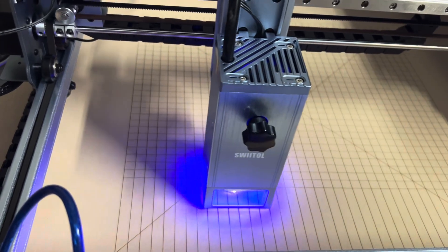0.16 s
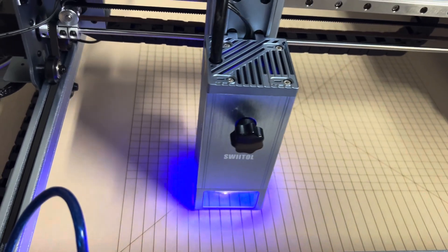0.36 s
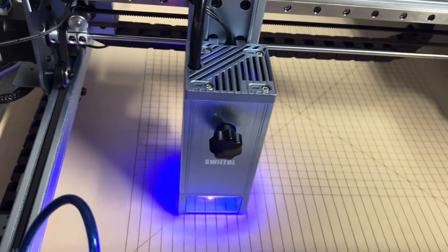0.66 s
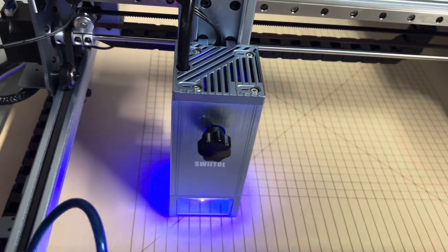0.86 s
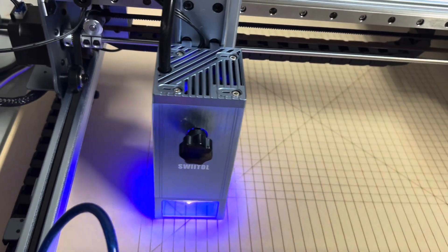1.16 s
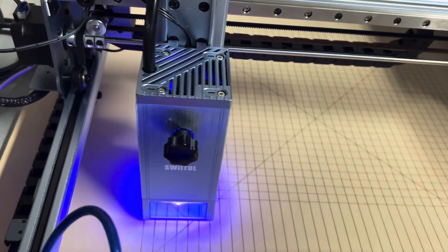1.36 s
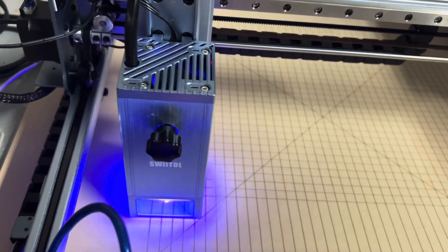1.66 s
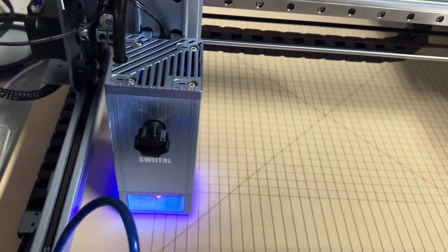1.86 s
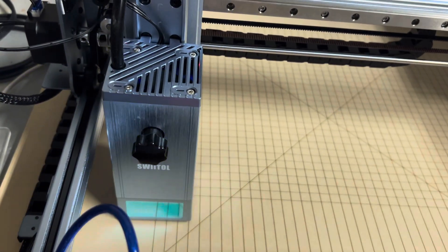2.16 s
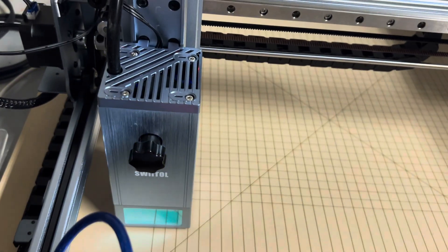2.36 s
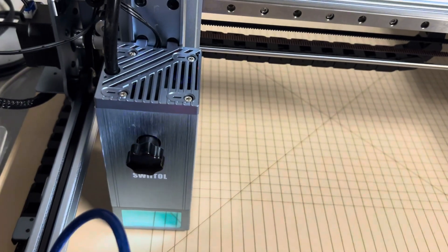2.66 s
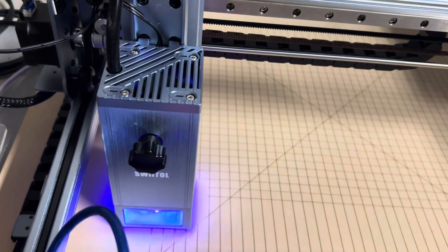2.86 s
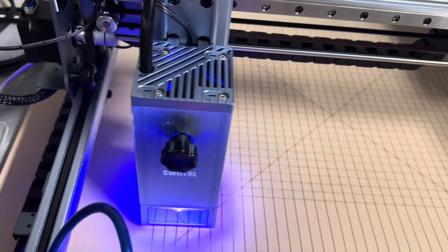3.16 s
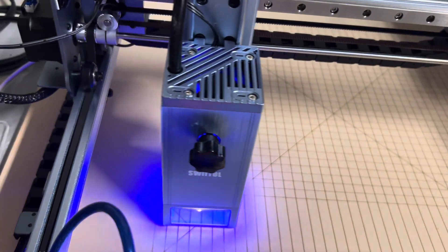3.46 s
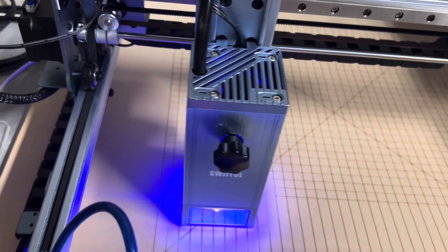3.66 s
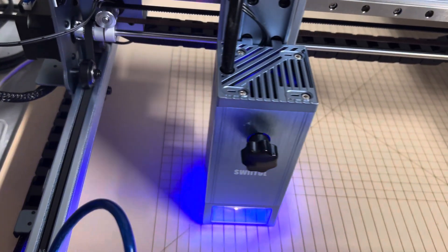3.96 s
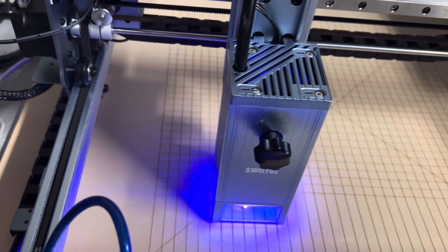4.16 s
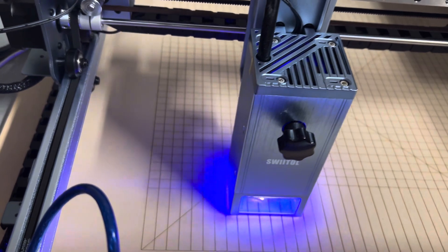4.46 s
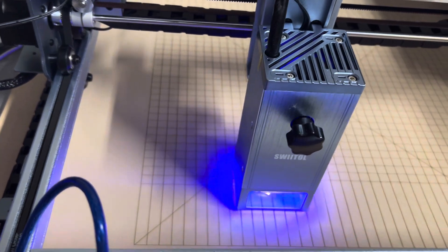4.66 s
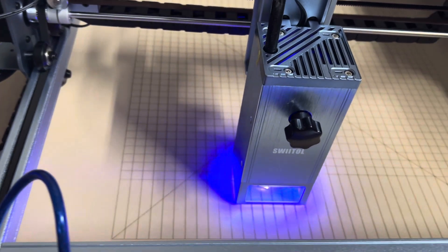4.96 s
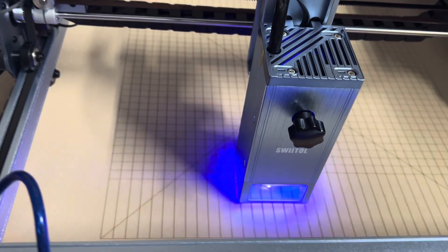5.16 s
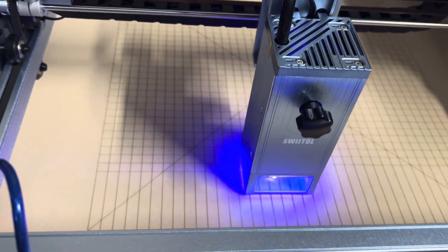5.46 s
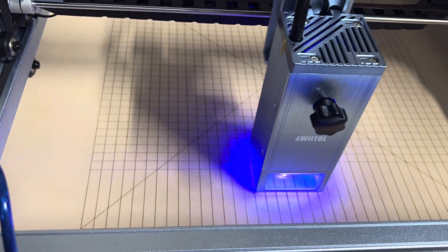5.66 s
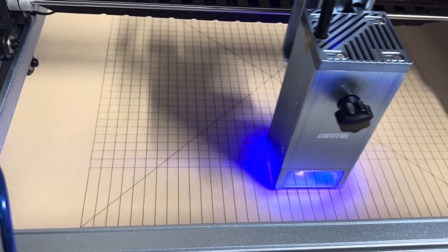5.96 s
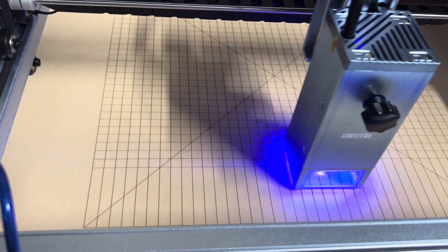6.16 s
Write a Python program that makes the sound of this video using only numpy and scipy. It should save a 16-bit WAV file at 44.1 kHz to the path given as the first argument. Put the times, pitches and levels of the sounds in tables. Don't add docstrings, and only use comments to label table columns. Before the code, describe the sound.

A steady rush of fan and air-jet noise with a thin high whine that drops out for a second mid-way, then returns as the engraver head travels back.

```python
import sys
import numpy as np
from scipy import signal
from scipy.fft import rfft, irfft, next_fast_len
from scipy.io import wavfile
from scipy.ndimage import uniform_filter1d

SR = 44100
rng = np.random.default_rng(int(sys.argv[2]) if len(sys.argv) > 2 else 0)


def voltage_ratio(decibels):
    exponent = np.asarray(decibels, float) / 20
    return 10 ** exponent


def transcribe(u):
    v = np.clip(np.atleast_2d(u).T, -1, 1)
    q = np.round(v * 32767).astype(np.int16)
    wavfile.write(sys.argv[1], SR, q)


N = 279153

HISS_FROM_HZ = 6900
BEAM_OFF_S, BEAM_ON_S = 1.93, 2.8


def away():
    t = np.arange(N) / SR
    return np.clip(np.maximum(BEAM_OFF_S - t, t - BEAM_ON_S), 0, None)


def outward():
    return np.arange(N) / SR > BEAM_ON_S


def head_place():
    reach_in_s, reach_out_s, place_at_end = 1.68, 1.28, .05
    reach_s = np.where(outward(), reach_out_s, reach_in_s)
    return place_at_end + (1 - place_at_end) * np.tanh(away() / reach_s)


def drift(per_s):
    points, spacing_s = 640, .01
    slow = np.fft.rfftfreq(points, spacing_s) < per_s
    x = irfft(rfft(rng.standard_normal(points)) * slow)
    return np.interp(np.arange(N) / SR, np.arange(points) * spacing_s, x / x.std())


def tone(hz, level_db, pan_db, lead=0., waver_db=1., start=0.):
    turn = 2 * np.pi * (np.cumsum(hz * np.ones(N)) / SR + start)
    size = np.sqrt(2) * voltage_ratio(level_db + waver_db * drift(5.))
    left = voltage_ratio(pan_db / 2) * np.sin(turn)
    right = voltage_ratio(-pan_db / 2) * np.sin(turn + lead)
    return size * np.array([left, right])


def read(rows, hz):
    f, *columns = np.transpose(rows)
    return np.array([np.interp(np.log(hz + 1), np.log(f + 1), c) for c in columns])


def eddies(shape, bins, frames):
    x = uniform_filter1d(rng.standard_normal(shape), size=bins, axis=0)
    x = uniform_filter1d(x, size=frames, axis=1)
    return x / x.std()


def colour(fan, jet, hiss, hz):
    # frequency in Hz, level in dB per Hz, left minus right in dB,
    # left-right likeness 0-1, right phase lead in rad.
    workshop = [(25, -95, -0.1, 0.69, -0.07), (35, -86, 0.5, 0.91, 0.02), (45.4, -77, -1.3, 1, 0.05),
                (75, -70, -0.9, 0.99, 0.02), (95, -75.5, -0.8, 0.87, -0.035), (150, -74, -2.4, 0.94, -0.12),
                (200, -71, 0, 1, -0.0075), (222, -77.5, -2, 0.44, -0.2), (285, -75, 0, 0.95, -0.04),
                (345, -75.0, -1, 0.77, -0.08), (390, -74.5, 2, 0.9, -0.18), (448, -72.6, 0.4, 0.91, -0.31),
                (567, -72, 1, 1, -0.49), (630, -69.0, 0.2, 0.92, -0.43)]
    # frequency in Hz, right phase lead in half turns.
    hiss_turns = [(6900, -.06), (8150, .04), (8500, .5), (9000, .8), (9500, 1), (10200, 1.13),
                  (10550, 1.55), (11000, 1.85), (12250, 2.05), (12450, 2.67), (13050, 2.88), (13500, 3),
                  (13900, 3.16), (14600, 3.7), (15300, 4)]
    field = read(workshop[:-1] + fan[:-1] + jet, hz)
    high = hz > HISS_FROM_HZ
    field[0, high] = read(hiss, hz)[0, high]
    field[1:3, high] = [[.2], [.99]]
    field[3, high] = np.pi * read(hiss_turns, hz)[0, high]
    return field[:, :, None]


def rush():
    # frequency in Hz, level in dB per Hz,
    # left minus right in dB, left-right likeness 0-1, right phase lead in rad.
    fan_left = [(630, -68.5, 1, 0.8, -0.66), (720, -64.5, 2, 1, -0.75), (870, -62, 4.5, 0.93, -1.6),
                (944, -62.5, 10, 0.53, -1.2), (1010, -72, -0.4, 0.3, 1), (1145, -73.5, 15, 0.45, -1.3),
                (1276, -64.5, 6, 0.58, -1.4), (1430, -64.5, 10, 0.73, -0.89), (1620, -64.5, 0, 0.88, -1.13),
                (1660, -68.5, -1, 0.67, -2.1), (1800, -73.5, 4, 0.4, -1), (1950, -71, 8, 0.47, -0.24),
                (2220, -66, 11, 0.45, -0.9), (2300, -70.5, 8.2, 0.64, -0.8)]
    fan_right = [(624, -71.5, -2, 0.91, -0.34), (687, -65.5, 1, 0.9, -0.34), (876, -65.5, 3, 0.68, -0.072),
                 (963, -69, 8, 0.49, 0.02), (1053, -59.5, 8, 0.88, -0.44), (1180, -67, 6, 0.99, -0.39),
                 (1300, -66.5, 1, 0.64, 0.03), (1430, -63.5, 7, 0.99, -0.0089),
                 (1610, -61.5, -1.5, 0.97, -0.0045), (1710, -61.5, -4, 0.95, -0.15),
                 (1826, -70.5, -1, 0.95, 0.01), (1950, -68, 1, 0.96, -0.034), (2180, -65.5, 0, 0.88, -0.15),
                 (2300, -66.6, 3.0, 0.87, -0.45)]
    jet_left = [(2320, -70.5, 10, 0.54, -1), (2500, -66.5, 13, 0.69, -1.4), (2720, -69, 10, 0.6, -0.9),
                (2850, -71, 12, 0.36, -0.95), (3030, -73.5, 7.8, 0.44, 0.028),
                (3480, -68.5, 8.8, 0.81, -0.14), (4000, -72, 6.2, 0.68, -0.17),
                (4570, -69.5, 4.4, 1, -0.041), (4850, -67, 9.9, 0.74, 0.01), (5270, -71.5, 9.6, 0.75, 0.34),
                (5600, -75, 6.0, 0.62, 0.83), (5800, -79, 5.4, 0.63, 1.2), (6500, -78, 8.9, 0.7, -0.04),
                (6900, -79.5, 1.3, 0.87, -0.05)]
    jet_right = [(2310, -67, 1, 0.96, -0.78), (2560, -65, 4.5, 1, -1), (2670, -72, 2, 0.85, 0.86),
                 (2850, -69, 2, 0.87, -1.5), (3080, -74, 5, 0.71, 1.2), (3560, -73, 5, 0.91, -0.14),
                 (4100, -73.5, 0.5, 0.83, 0.17), (4530, -83, 9, 0.56, 1.3), (4780, -78, 6, 0.62, -0.28),
                 (5120, -75.5, 1.7, 0.73, -0.3), (5590, -81.5, 3, 0.34, 1.7), (5930, -84, 6, 0.3, 1.5),
                 (6300, -84.5, 4, 0.54, 0.49), (6700, -82, 3, 0.71, 0)]
    # frequency in Hz, level in dB per Hz.
    hiss_left = [(7000, -79.5), (7450, -78.5), (8200, -79.5), (9200, -78.5), (9900, -82), (11000, -85),
                 (12100, -83), (13000, -90), (13700, -77), (14400, -78), (14800, -77), (15200, -82.1),
                 (15650, -71), (15800, -97.9)]
    hiss_right = [(7000, -80), (7450, -76), (8200, -80), (9200, -79), (9900, -84), (11000, -82.5),
                  (12100, -85), (13000, -95), (13700, -74), (14400, -85), (14800, -82), (15200, -80),
                  (15650, -77), (15800, -102.0)]

    noise = rng.standard_normal((2, N))
    hz, t, (a, b) = signal.stft(noise, SR, nperseg=2048, noverlap=1536)
    place = head_place()[np.minimum((t * SR).astype(int), N - 1)]
    left = colour(fan_left, jet_left, hiss_left, hz)
    right = colour(fan_right, jet_right, hiss_right, hz)
    level_db, pan_db, same, lead = left + place * (right - left)

    thin = np.clip(hz / 9000, .3, 1.3)[:, None]
    level_db = level_db + 1.5 * thin * eddies(a.shape, bins=14, frames=6)
    hissing = (hz > HISS_FROM_HZ)[:, None]
    lead = lead + .21 * hissing * thin * eddies(a.shape, bins=40, frames=8)

    same = np.clip(same, 0, 1)
    share = np.sqrt(2 / (1 + voltage_ratio(2 * pan_db)))
    right_port = same * np.exp(1j * lead) * a + np.sqrt(1 - same ** 2) * b
    z = np.array([voltage_ratio(pan_db) * a, right_port])
    z = z * share * voltage_ratio(level_db) * np.sqrt(SR / 2)
    return signal.istft(z, SR, nperseg=2048, noverlap=1536)[1][:, :N]


def beam():
    # multiple, level in dB against the first, extra pan in dB,
    # right phase lead in rad.
    beam_orders = [(1, 0, -2, 0.21), (2, -10.5, 5, -0.2), (3, -23, 2, -0.5), (4, -29, 1, -1),
                   (5, -22, -6, 0), (7, -32, -3, -7), (8, -41, -3, -4), (9, -45, -5, 3), (11, -36, -3, 8),
                   (13, -37, -3, 8), (15, -32, -3, -.3)]
    beam_hz, fade_s = 1000, .12
    end_db, far_db, outward_db = -43.5, 6.5, 2.5
    pan_end_db, pan_far_db = 7.5, -3
    late_s, pan_late_db_per_s = 2.7, -9.5

    gone, place = away(), head_place()
    level_db = end_db + far_db * place + outward_db * outward()
    pan_db = pan_end_db + pan_far_db * place + pan_late_db_per_s * np.maximum(gone - late_s, 0)
    chop = sum(tone(k * beam_hz, level_db + db, pan_db + more_db, lead, waver_db=0.14, start=rng.random())
               for k, db, more_db, lead in beam_orders)
    return np.clip(gone / fade_s, 0, 1) * chop


def squeal():
    squeal_hz, peak_db, start_s = 5158.5, -52, 0.15
    spot_s, fall_db = 1.4, -4
    gone = away()
    level_db = peak_db + fall_db * (gone - spot_s) ** 2
    return np.clip((gone - start_s) / .06, 0, 1) * tone(squeal_hz, level_db, 5.4, 0.98, waver_db=1.5)


def head_fan():
    # order, level in dB rms, left minus right in dB,
    # right phase lead in rad.
    shaft_orders = [(1, -63, -3, -0.7), (5, -56.5, 4, -.7), (8, -53, 4, -0.58), (16, -54.5, 10, -0.6)]
    loaded_hz, free_hz, settle_s = 1240, 1255, 0.298
    loaded_db, free_db, late_db_per_s = -40.5, -6., 1.5
    pan_end_db, pan_db_per_s = -6, 5

    gone = away()
    hold = np.exp(-1 / (settle_s * SR))
    free = signal.lfilter([1 - hold], [1, -hold], (gone == 0) * 1.)
    blade_hz = (loaded_hz + (free_hz - loaded_hz) * free) * (1 + .0002 * drift(4.))
    level_db = loaded_db + free_db * free + late_db_per_s * np.maximum(gone - 1.8, 0)
    blades = tone(blade_hz, level_db, pan_end_db + pan_db_per_s * gone, -0.9, waver_db=0.8)
    shaft_hz = blade_hz / 7
    shaft = sum(tone(k * shaft_hz, db, side_db, lead, waver_db=2.5)
                for k, db, side_db, lead in shaft_orders)
    return blades + shaft


def drones():
    # frequency in Hz, level in dB rms, left minus right in dB, right phase lead in rad.
    steady_tones = [
        (60, -55.5, -.6, 0),
        (120, -48.3, -1, -.1),
        (240, -58, -1, -.3),
        (420, -57.5, -1, -.3),
        (247.8, -50, -1.2, .6),
        (495.7, -57, -10, .8),
    ]
    trims_db = [0.4, -0.34, -1.4, -0.94, -0.39, -2]
    return sum(tone(hz, db + trim_db, pan_db, lead, waver_db=0.5)
               for (hz, db, pan_db, lead), trim_db in zip(steady_tones, trims_db))


def shudder():
    # centre in seconds, half length in seconds, frequency in Hz, level in dB.
    swells = [
        (.7, .35, 55.6, -53.5),
        (1.4, .3, 55.6, -55),
        (2.0, .15, 55.6, -56),
        (2.25, .25, 49.5, -55),
        (2.8, .3, 49, -54),
        (5.7, .3, 55.5, -60),
    ]
    t = np.arange(N) / SR
    return sum(np.exp(-((t - s) / half) ** 2) * tone(hz, db, -.6, waver_db=-2.0, start=0.31)
               for s, half, hz, db in swells)


def stepper():
    # multiple, level in dB.
    step_orders = [(1, -.5), (3, -6), (6, -14), (7, -12)]
    from_s, to_s, ramp_s = 1.88, 2.91, .15
    rest_hz, run_hz = 75., 134.9
    run_db, sag_db_per_s, rest_db = -47., -.5, -18.
    t = np.arange(N) / SR
    speed = np.clip(np.minimum(t - from_s, to_s - t) / ramp_s, 0, 1)
    hz = rest_hz + (run_hz - rest_hz) * speed
    level_db = run_db + sag_db_per_s * (t - from_s) + rest_db * (1 - speed) ** 2
    hum = sum(tone(k * hz, level_db + db, -2.5, -.2, waver_db=0., start=.45) for k, db in step_orders)
    return (speed > 0) * hum


def scene():
    return rush() + beam() + squeal() + head_fan() + drones() + shudder() + stepper()


def low_pass(x):
    return signal.sosfilt(signal.butter(12, 17100, fs=SR, output="sos"), x)


def record(dry):
    size = next_fast_len(N)
    hz = np.fft.rfftfreq(size, 1 / SR)
    treble_edge = np.clip((15800 - hz) / 60, 0, 1)
    bass_cut = np.clip(hz / 28, 0, 1) ** 2
    mix = irfft(rfft(dry, size) * treble_edge * bass_cut, size)[:, :N]
    return low_pass(mix)


dry = scene()
out = record(dry)
transcribe(out)
```